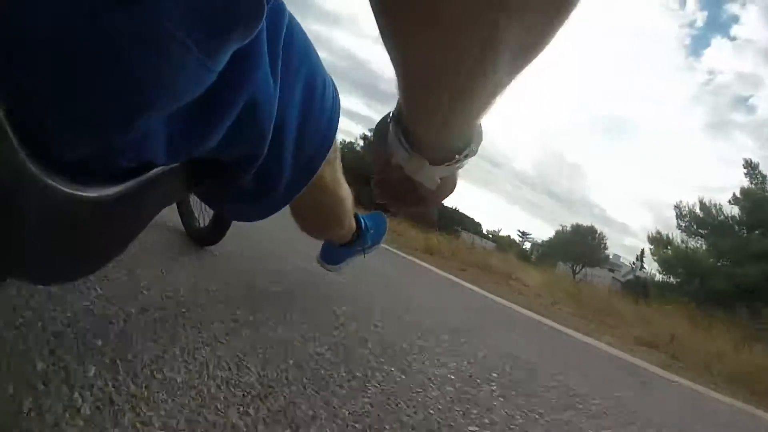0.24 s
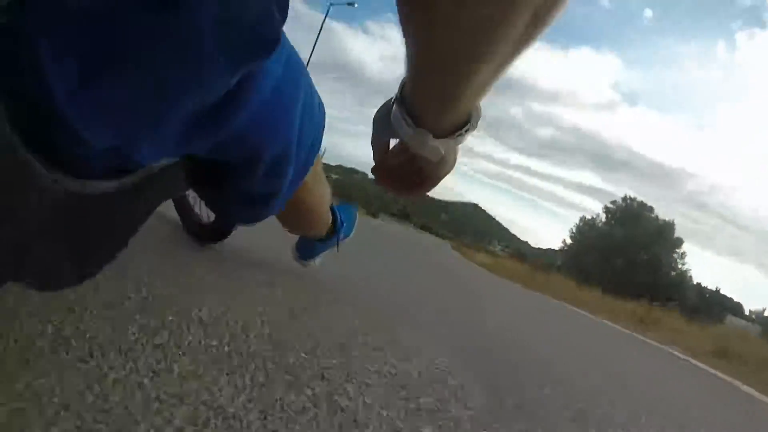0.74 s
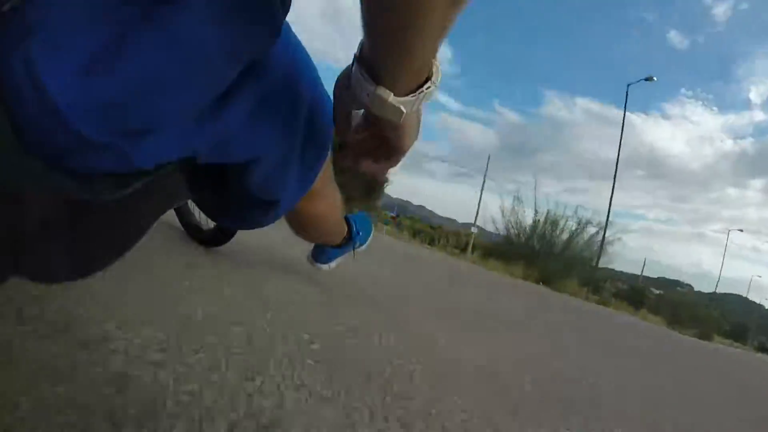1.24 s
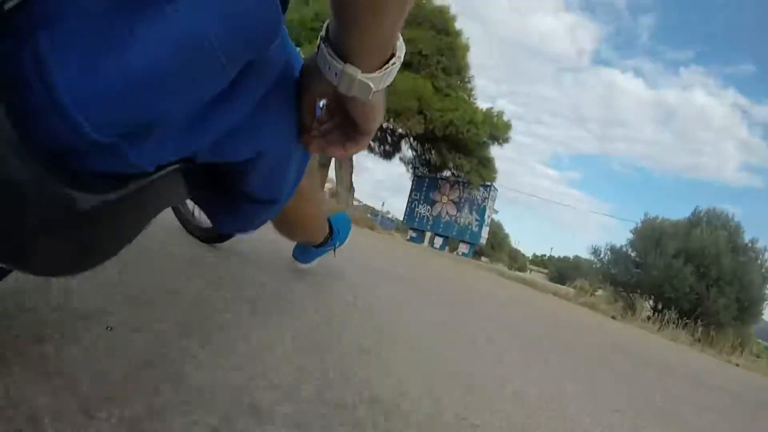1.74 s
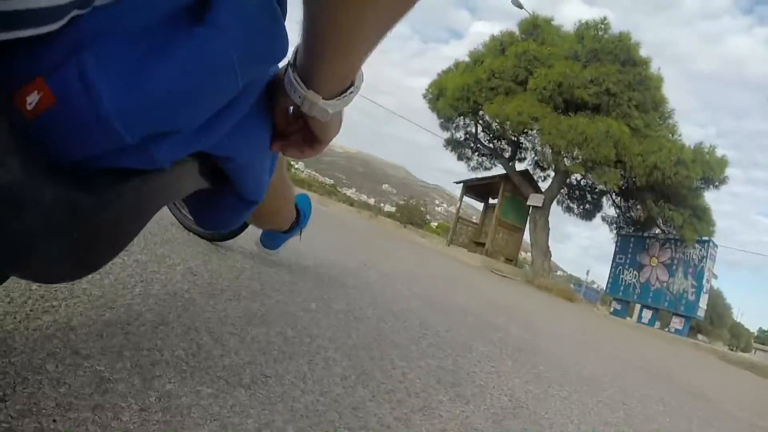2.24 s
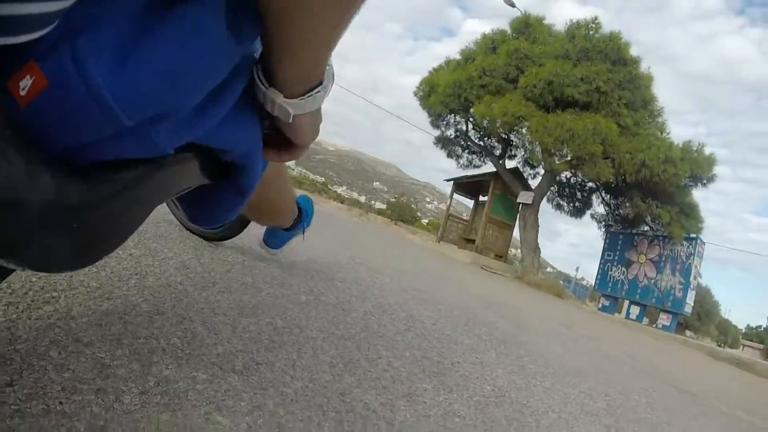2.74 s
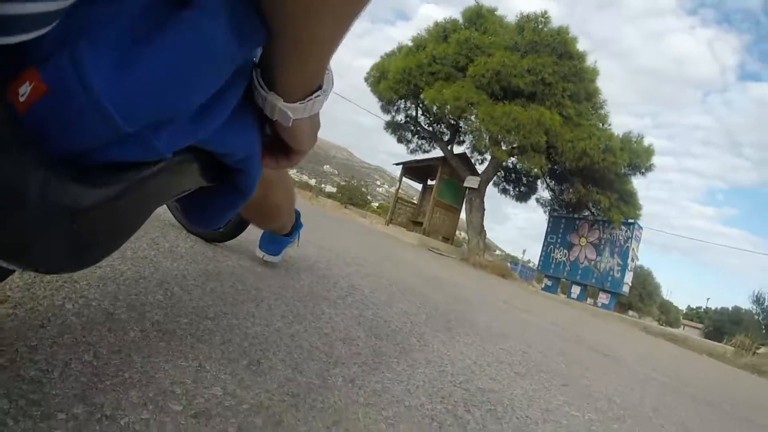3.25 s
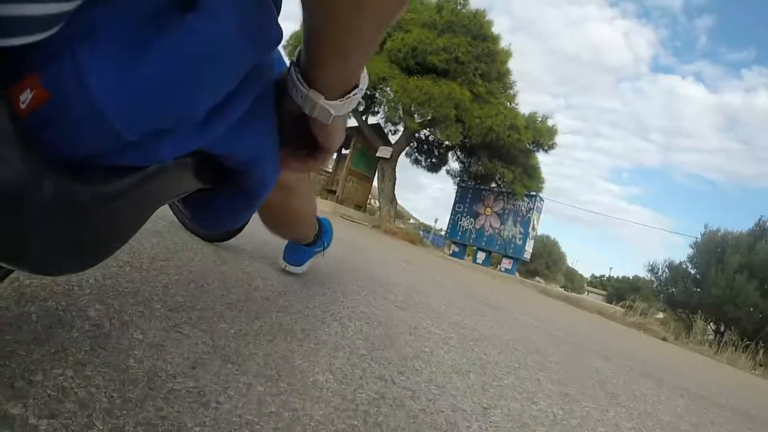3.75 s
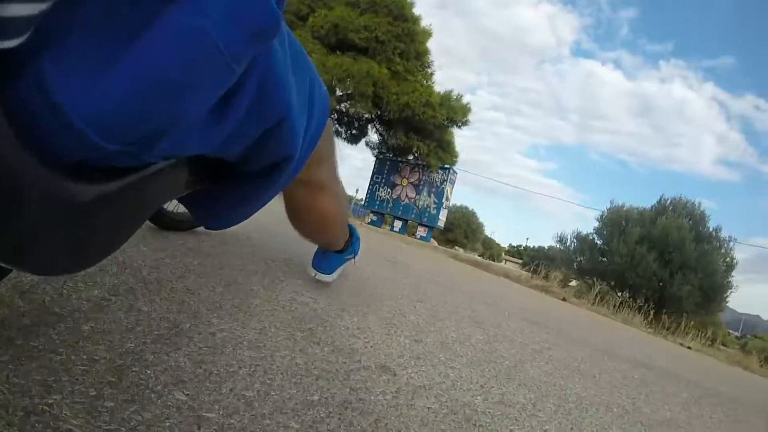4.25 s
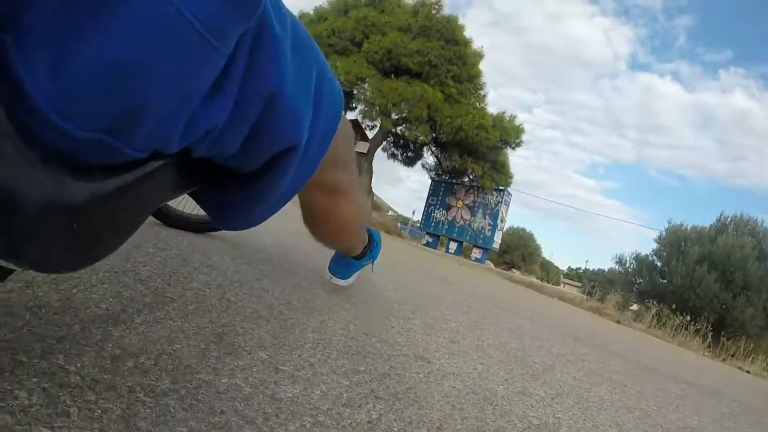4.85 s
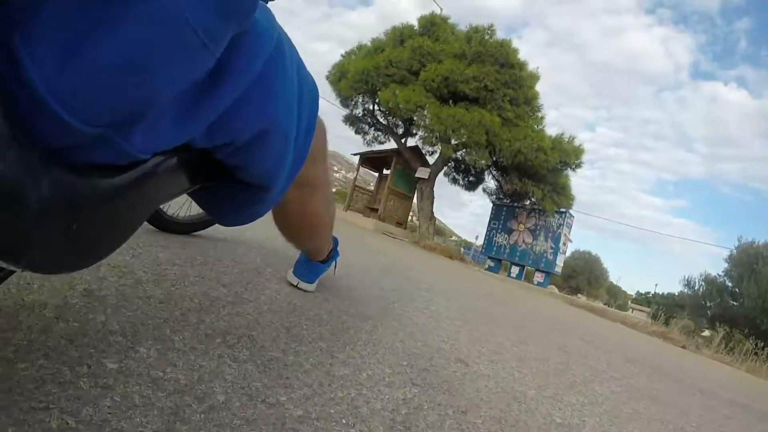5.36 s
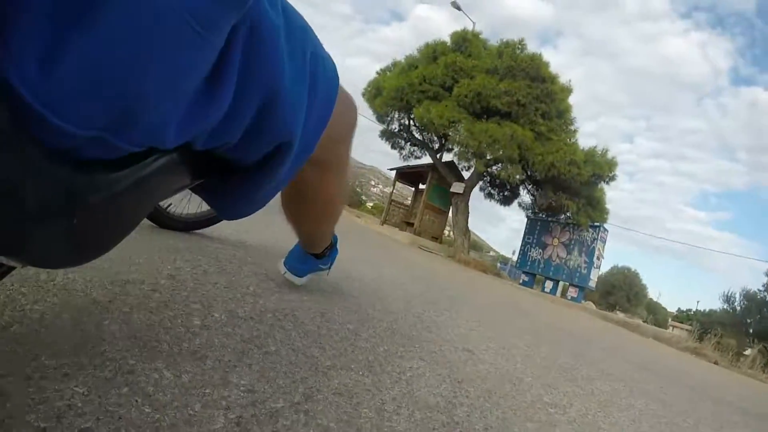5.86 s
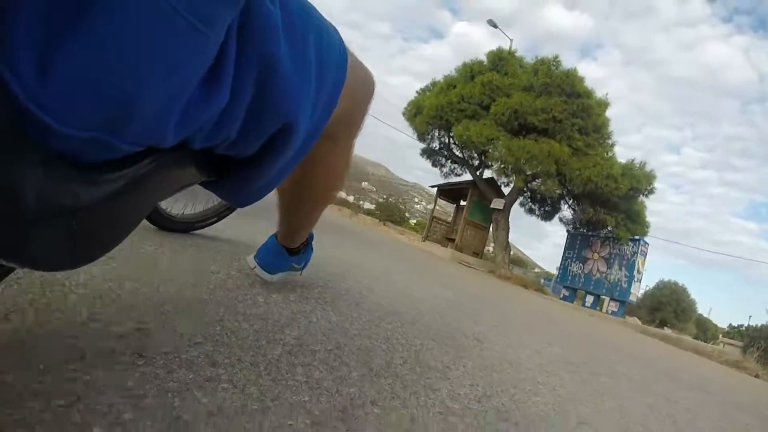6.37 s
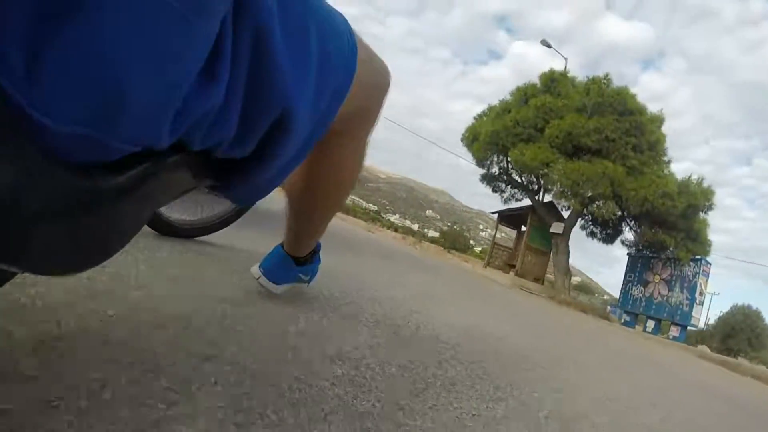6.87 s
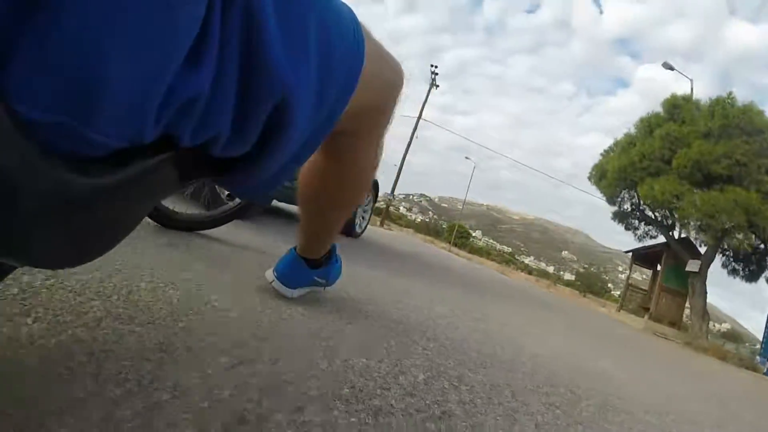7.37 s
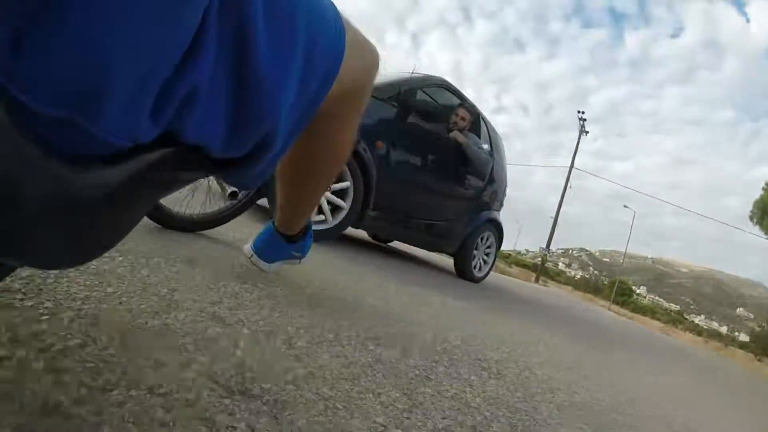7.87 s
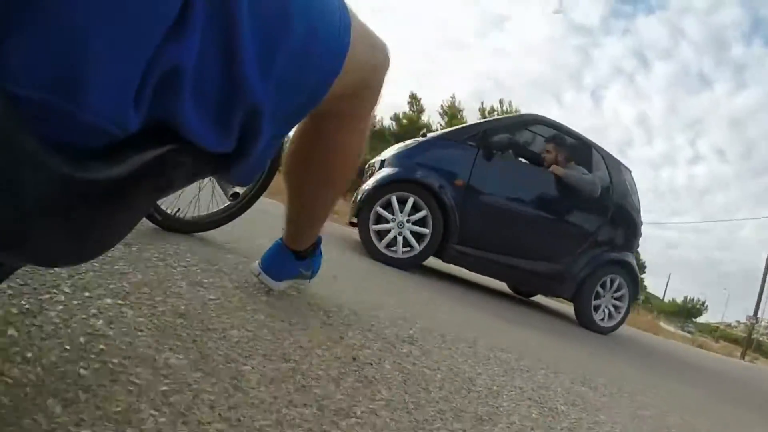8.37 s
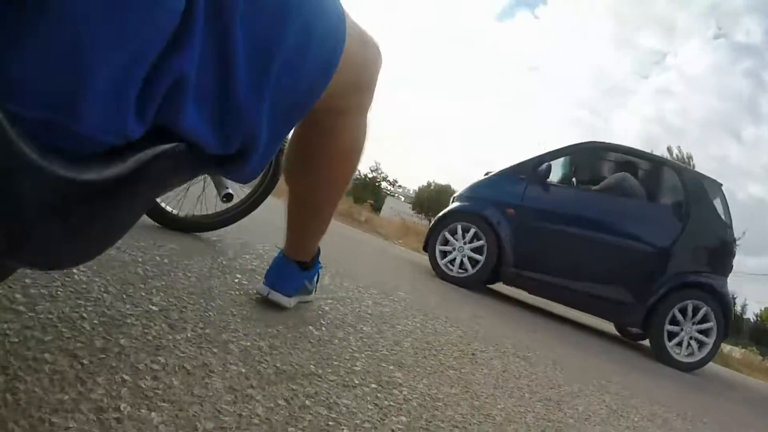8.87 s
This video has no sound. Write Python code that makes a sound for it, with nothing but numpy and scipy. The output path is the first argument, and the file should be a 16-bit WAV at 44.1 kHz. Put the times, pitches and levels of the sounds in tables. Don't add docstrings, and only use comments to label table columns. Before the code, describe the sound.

Everything is close and dry, carried through the frame of a small three-wheeler on an open asphalt road. From 0 to 2.2 s it is loud and rough: a low throbbing hum around 150 to 200 hertz, buried under dense gritty clatter, housing slaps and thin bright rattle in rapid irregular bursts, with a tiny squeak near 0.3. At 2.2 the wheels lift, touch briefly, then from about 2.4 to 2.8 the roar drops away to faint ringing spokes and a slow deep sway. Soft, dull bumps from 2.8 to 3.0 restore contact. Afterwards the ride is darker and smoother: a wavering low drone, weaker around 4.5, swelling on bumps near 3.7, 4.2 and 6.2, peppered with short metallic stone knocks, grit taps and small clicks. From 7.15 the mount ticks and snaps in brief crackles; around 8.25 a car's soft tyre roar swells and recedes. Rolling continues to 9.1.

```python
import sys
import numpy as np
from scipy import signal
from scipy.io import wavfile
from scipy.ndimage import uniform_filter1d

SR = 44100
rng = np.random.default_rng(int(sys.argv[2]) if len(sys.argv) > 2 else 0)


def ratio(d):
    e = np.asarray(d, float) / 20
    return 10 ** e


def to_wav(sig):
    pcm = np.clip(np.atleast_2d(sig), -1, 1) * 32767
    pcm = np.round(pcm).astype(np.int16)
    wavfile.write(sys.argv[1], SR, pcm.T)


N = 401751

# (time [s], first mode level [dB])
FRAME_LOAD = [(0.0, -21.5), (0.12, -16), (1.45, -15), (1.72, -20.5), (1.88, -15), (2.2, -15.5), (3.09, -20),
              (3.4, -12.5), (3.8, -17), (4.23, -18.5), (4.46, -27), (4.94, -18.5), (5.12, -14.5),
              (5.99, -17), (6.4, -16), (6.8, -16.5), (7.1, -12.5), (9.11, -13.5)]
# (frequency [Hz], width [Hz])
FRAME_MODES = [(146, 10), (218, 13)]
# (time [s], level [dB])
GRIP = [
    (2.2, 1),
    (2.23, -20),
    (2.28, -13),
    (2.32, -1.5),
    (2.37, -36.5),
    (2.79, -26),
    (2.84, -9.5),
    (2.92, -11.5),
    (2.99, 0.5),
]
# (time [s], level [dB], one-sidedness [0-1])
BUMPS = [(0.324, -15, 0.8), (1.518, 0, 0), (2.002, -1, 0.4), (3.072, 7.5, 0.4), (3.372, 6.5, 1),
         (3.568, -4.5, .05), (3.711, 14, 0.8), (3.98, -4.5, 0.89), (4.186, 13, 0.48), (4.39, 2.5, 0.06),
         (5.019, -9.5, .05), (5.399, 8.5, 0.81), (5.528, -5.5, 0.99), (5.559, 6.5, .05), (5.63, 8, 0.93),
         (5.678, -6, 0.5), (5.759, -8.5, 0.7), (5.828, 6.5, 1), (5.938, -4, 1), (6.011, 4, 1),
         (6.194, 19.5, 0.7), (6.42, -8, 0), (6.47, 8, 0.1), (6.92, 11, 0.6), (7.003, -17.5, 0.6),
         (7.258, 7, 1), (8.172, -1.5, 0.1), (8.249, 4, 0.2), (8.35, -7.5, 0), (8.571, 1, 0.8)]
# (time [s], unevenness [dB], grain [dB])
ROAD = [(0.0, -30, -28), (0.24, -24.5, -36.5), (0.92, -26.5, -26.5), (1.47, -25, -19.5), (2.03, -23.5, -29),
        (2.18, -39, -20), (2.23, -18.5, -27.5), (2.4, -29.5, -23.5), (2.93, -36, -52.5), (3.34, -26.5, -41),
        (3.87, -27.5, -47), (4.2, -32.5, -45), (4.75, -57, -49.5), (5.6, -45, -41), (6.1, -30, -45.5),
        (7.0, -37.5, -40), (8.6, -28, -39.5), (9.11, -45, -37.5)]
# (time [s], sway [dB], looseness [dB])
MOUNT = [(0.0, -57, -52), (1.02, -42, -45), (2.18, -58, -50), (2.3, -35, -52.5), (2.6, -31.5, -60),
         (2.92, -31, -73), (3.04, -22, -75), (3.21, -18, -57), (3.6, -21.5, -100), (3.85, -24, -74.5),
         (4.31, -22.5, -75), (4.74, -27.5, -81.5), (5.2, -25, -75), (5.7, -15, -75.5), (6.11, -25, -76.5),
         (6.9, -23.5, -64.5), (7.3, -34, -54), (9.11, -37.5, -56.5)]
# (frequency [Hz], width [Hz], level [dB])
BODY_RING = [(625, 74, 8.5), (450, 21, 1.5), (870, 39, -9), (1250, 200, -2), (1525, 180, 2),
             (1699, 71, 3.5), (2432, 200, -10.5), (2605, 290, -8.5), (3430, 180, -43), (3330, 110, -36)]
# (frequency [Hz], width [Hz], level [dB])
RUMBLE_RING = [(57, 25, -8.5), (101, 110, 7.5)]
# (time [s], peak level [dB], hold [s])
COARSE_PATCHES = [(0.05, -32.5, 0.01), (0.078, -17.5, 0.0058), (0.109, -14.5, 0.011), (0.14, -8, 0.019),
                  (0.165, -15, 0.0057), (0.209, -6.5, 0.016), (0.248, -5.5, 0.0077), (0.303, -11, 0.0085),
                  (0.361, -8.5, 0.0092), (0.393, -10.5, 0.015), (0.445, -8, 0.0058), (0.5, -4.5, 0.0026),
                  (0.537, -16, 0.018), (0.551, -13.5, 0.019), (0.588, -4.5, 0.0074), (0.608, -7, 0.0056),
                  (0.647, -10.5, 0.011), (0.671, -12, 0.0059), (0.712, -16.5, 0.015), (0.751, -6.5, 0.025),
                  (0.8, -7.5, 0.035), (0.864, -7.5, 0.051), (0.901, -5.5, 0.023), (0.93, -9, 0.015),
                  (0.995, -3.5, 0.043), (1.056, -10, 0.027), (1.099, -13.5, 0.012), (1.129, -11, 0.01),
                  (1.157, -6.5, 0.016), (1.211, -5.5, 0.032), (1.236, -6, 0.025), (1.29, -22, 0.014),
                  (1.312, -9, 0.0099), (1.341, -7.5, 0.0086), (1.358, -11.5, 0.004), (1.415, -6, 0.047),
                  (1.484, -4.5, 0.027), (1.508, -10, 0.0098), (1.546, -11.5, 0.0079), (1.578, -4.5, 0.0057),
                  (1.621, -10.5, 0.0085), (1.645, -15.5, 0.012), (1.687, -16.5, 0.013),
                  (1.703, -8.5, 0.023), (1.75, -11.5, 0.057), (1.793, -11.5, 0.0043), (1.868, -5, 0.0075),
                  (1.958, -15.5, 0.0098), (2.02, -39, 0.011), (2.039, -12, 0.0097), (2.087, -8, 0.0046),
                  (2.13, -8.5, 0.027), (2.184, -13, 0.015)]
# (frequency [Hz], width [Hz], level [dB])
HOUSING_RING = [(383, 220, 7), (1030, 322, 6), (1500, 334, 4), (2445, 495, 1.5), (3600, 2600, -40)]
# (frequency [Hz], width [Hz], level [dB])
HOUSING_TOP_RING = [(4400, 550, -31), (6440, 810, -29.5), (7000, 1100, -33), (9800, 1700, -31.5),
                    (10000, 1300, -41.5), (13500, 2400, -53)]
# (frequency [Hz], width [Hz], level [dB])
PUSH_RING = [(150, 64, -6.5), (250, 97, 2.5)]
# (frequency [Hz], width [Hz], level [dB])
TICK_RING = [(3640, 200, 0), (4990, 830, -4), (5680, 910, -4.5), (7350, 370, -8.5), (8030, 690, -16)]
# (start [s], length [s], level [dB])
RATTLE_RUNS = [(0.006, 0.04, -49), (0.098, 0.03, -46.5), (0.134, 0.074, -52), (0.198, 0.036, -56),
               (0.235, 0.038, -52), (0.285, 0.03, -52), (0.31, 0.034, -48.5), (0.355, 0.05, -53),
               (0.44, 0.03, -47), (0.479, 0.038, -53), (0.527, 0.048, -54), (0.58, 0.088, -47),
               (0.661, 0.044, -45.5), (0.699, 0.054, -46.5), (0.744, 0.094, -51), (0.846, 0.052, -50),
               (0.89, 0.086, -54.5), (0.994, 0.062, -40), (1.05, 0.092, -55), (1.13, 0.062, -48),
               (1.184, 0.106, -49), (1.293, 0.04, -51), (1.332, 0.05, -48), (1.392, 0.134, -51),
               (1.536, 0.058, -49), (1.612, 0.092, -52.5), (1.707, 0.1, -47), (1.828, 0.08, -47.5),
               (2.03, 0.03, -44), (2.08, 0.064, -51.5), (2.135, 0.076, -50)]
# (frequency [Hz], width [Hz], level [dB])
RATTLE_RING = [(9870, 2000, -1.5), (11400, 1800, -7)]
# (time [s], peak [dB], low ring [dB re peak], high ring [dB re peak])
WHEEL_KNOCKS = [(3.0824, -10.5, -10, -50), (3.2312, -24, -4.5, -46), (3.3735, -8.5, -10, -43),
                (3.411, -17.5, -10, -53.5), (3.772, -31.5, 3, -32), (4.208, -23.5, 0, -51),
                (4.6135, -22.5, -7, -46), (4.8949, -23, -2, -48), (4.985, -11.5, -18, -50),
                (5.07, -9, -12.5, -46), (5.2024, -4, -20, -40.5), (5.268, -17, -8, -44),
                (5.3229, -6, -8, -53.5), (5.5268, -12.5, -25.5, -51), (5.6929, -11.5, -4.5, -63),
                (5.7919, -16.5, -8, -62), (5.8522, -11, -12.5, -42), (6.161, -12, -14.5, -56),
                (6.2089, -14.5, -24, -46), (6.4654, -18.5, 1, -44), (6.6569, -17, -1.5, -46),
                (7.0879, -17.5, -6, -45), (7.3584, -9, -3.5, -62), (7.8009, -28, 3.5, -47),
                (7.9292, -13, -14, -47), (8.1253, -19.5, -6, -43), (8.3863, -39, 2, -42),
                (8.5216, -13.5, -2.5, -43), (8.5569, -15.5, -0.5, -46), (8.7026, -15.5, -4, -41)]
# (time [s], peak level [dB])
STONE_TAPS = [(3.322, -24), (3.3514, -18), (4.1152, -26), (4.1436, -19), (4.1686, -20), (4.2954, -25),
              (4.3454, -23.5), (4.4442, -22.5), (4.8181, -20.5), (5.962, -29), (5.4756, -23), (5.5998, -23),
              (5.6248, -19), (5.6632, -20), (5.743, -22.5), (5.8218, -21.5), (6.1366, -22.5),
              (6.3569, -19.5), (6.378, -22), (6.5342, -28), (6.712, -23.5), (6.7472, -22.5), (6.7907, -19),
              (6.8849, -21), (7.1406, -23.5), (7.5898, -20), (7.6322, -19.5), (7.908, -17), (8.0426, -19.5),
              (8.9327, -34)]
# (time [s], peak level [dB])
WHEEL_GRIT = [(3.014, -33), (3.13, -26), (3.198, -24.5), (3.446, -19.5), (3.564, -27), (3.598, -21),
              (3.727, -23.5), (4.316, -29), (4.478, -30), (4.531, -28), (4.56, -26.5), (4.721, -30),
              (4.754, -24.5), (4.858, -32), (4.513, -38), (5.15, -24), (5.364, -24.5), (5.513, -29.5),
              (5.983, -24.5), (6.266, -22), (6.324, -25), (6.414, -22), (6.506, -26.5), (6.926, -20.5),
              (7.065, -28), (7.159, -18), (7.208, -22), (7.242, -24), (7.47, -15), (7.518, -33),
              (7.826, -19.5), (8.319, -19), (8.4, -19), (8.457, -30), (8.591, -18), (8.607, -22),
              (8.855, -25), (8.891, -27), (9.08, -24)]
# (frequency [Hz], level [dB], decay by 60 dB [s])
WHEEL_MODES = [(622.6, -16, 0.074), (1137, -12, 0.019), (1640, -5.5, 0.03), (2210, -13, 0.011),
               (2600, -14.5, 0.021), (2668, -26, 0.027), (3580, -15, 0.043), (4170, -20, 0.023),
               (4550, 0.5, 0.096), (6200, -35, 0.063), (6740, -17, 0.036), (7500, -36, 0.044)]
# (time [s], peak level [dB])
LANDING_BUMPS = [
    (2.833, -23.5),
    (2.897, -14),
    (2.955, -7.5),
    (3.036, -5),
]
# (start [s], length [s], peak level [dB])
SNAP_BOUTS = [(7.149, 0.03, -47), (7.218, 0.051, -36.5), (7.374, 0.003, -54), (7.455, 0.013, -35),
              (7.772, 0.02, -38), (7.861, 0.0034, -33), (7.964, .007, -39.5), (8.041, 0.027, -34),
              (8.139, .007, -35.5), (8.1745, 0.033, -31.5), (8.231, .03, -38.5), (8.2904, 0.038, -39.5),
              (8.39, 0.023, -35.5), (8.448, 0.037, -43), (8.5212, 0.091, -33), (8.698, .017, -31.5),
              (8.935, 0.011, -37)]
# (frequency [Hz], width [Hz], level [dB])
SNAP_RING = [(674, 270, 23), (1510, 1600, 10.5), (3220, 1900, -10), (5380, 640, 7), (6960, 250, -7),
             (10170, 1000, -5), (10900, 2200, 0.5)]
# (time [s], peak level [dB])
LONE_CLICKS = [(3.0798, -51), (3.1436, -57.5), (3.202, -61), (3.2354, -35.5), (3.2968, -46), (3.3756, -54),
               (3.4474, -38), (3.4878, -39.5), (3.5966, -49), (3.637, -40), (3.7328, -43.5), (3.7722, -37),
               (3.8979, -47.5), (3.9278, -48.5), (3.9593, -45), (4.0351, -49), (4.1448, -44.5),
               (4.1872, -38.5), (4.2127, -48), (4.2321, -43.5), (4.3564, -62), (4.3908, -63), (4.6153, -64),
               (4.7215, -56), (4.9864, -52), (5.0732, -51.5), (5.2044, -37), (5.2658, -47.5), (5.3227, -48),
               (5.3576, -41), (5.4105, -49), (5.5267, -56), (5.5696, -46.5), (5.618, -50), (5.8515, -51),
               (6.1902, -45.5), (6.2655, -39), (6.287, -49), (6.3189, -56), (6.3493, -57.5), (6.4526, -53),
               (6.4696, -50.5), (6.484, -42.5), (6.5115, -49.5), (6.5254, -40.5), (6.5848, -60.5),
               (6.5988, -46), (6.6242, -64), (6.6417, -44.5), (6.6671, -44), (6.695, -60), (6.7409, -47),
               (6.7459, -46), (6.8058, -49.5), (6.8682, -49), (6.928, -33), (6.9769, -41.5),
               (7.0383, -46.5), (7.0672, -39)]
# (frequency [Hz], width [Hz], level [dB])
CLICK_RING = [(3200, 1600, 6), (5840, 730, 5.5)]
# (time [s], peak level [dB])
START_CLICK = [
    (0.0015, -25),
]
# (frequency [Hz], width [Hz], level [dB])
START_RING = [(6000, 7500, 4.5), (14000, 6800, 3)]
# (time [s], first [dB], second [dB], third [dB])
SPOKE_LEVELS = [
    (2.19, -100, -100, -100),
    (2.21, -39.5, -87, -71),
    (2.34, -52, -81, -74),
    (2.39, -58, -62, -71),
    (2.53, -55, -56, -62),
    (2.618, -70, -62, -64),
    (2.8, -77, -64, -64),
    (3.0, -61, -66, -64),
]
# (strongest [Hz], weaker [Hz], weakest [Hz])
SPOKE_LINES = [
    [1766, 1561, 1631],
    [2724, 2789, 2765],
    [1066, 1130, 904],
]
# (time [s], frequency [Hz], level [dB])
SPOKE_WHIRR = [
    (2.36, 1130, -86),
    (2.5, 1076, -59),
    (2.75, 1090, -73),
    (2.9, 1030, -67),
    (3.05, 953, -67),
]
# (time [s], frequency [Hz], level [dB])
ROAD_WHINE = [
    (2.85, 3200, -97),
    (2.91, 3250, -67),
    (2.97, 3330, -70),
    (3.05, 3400, -85),
]
# (time [s], peak level [dB])
LOW_PINGS = [(4.5337, -62), (4.7238, -60), (4.818, -65), (4.9857, -49), (5.075, -61), (5.2057, -55),
             (5.2695, -65), (5.3214, -62), (5.5279, -64), (5.5693, -63.5), (5.6182, -55.5), (5.6911, -61),
             (5.8158, -61), (5.8547, -56)]
# (time [s], peak level [dB])
HIGH_PINGS = [(4.3905, -61), (4.5347, -61), (4.615, -64), (4.7253, -69), (4.8185, -65), (4.9896, -60),
              (5.073, -54), (5.205, -53), (5.27, -66), (5.3239, -54), (5.3583, -60), (5.5269, -65),
              (5.6177, -63), (5.8505, -65)]
# (time [s], level [dB])
CAR_LEVEL = [
    (7.2, -60.5),
    (7.9, -51.5),
    (8.25, -38),
    (8.65, -54),
    (9.11, -53),
]
# (frequency [Hz], width [Hz], level [dB])
CAR_RING = [(523, 440, 4), (890, 160, -5.5)]

COARSE_END_S = 2.198
AIRBORNE_FROM_S, AIRBORNE_TO_S = 2.3, 2.8
BODY_TOP_HZ = 3150
PATCH_DB = -13


def rms_one(x):
    return x / np.sqrt(np.mean(x ** 2) + 1e-20)


def in_time(rows):
    s, *columns = np.transpose(rows)
    after = -120 if s[-1] < 9 else None
    return [np.interp(np.arange(N) / SR, s, column, right=after) for column in columns]


def peak(x, hz, width):
    r = np.exp(-np.pi * max(width, 1) / SR)
    poles = [1, -2 * r * np.cos(2 * np.pi * hz / SR), r * r]
    return signal.lfilter([(1 - r * r) / 2, 0, (r * r - 1) / 2], poles, x + 1e-18)


def dying_line(strikes, hz, t60):
    r, w = ratio(-60 / (t60 * SR)), 2 * np.pi * hz / SR
    return signal.lfilter([0, np.sin(w)], [1, -2 * r * np.cos(w), r * r], strikes + 1e-18)


def fading(x, fade_s):
    return signal.lfilter([1], [1, -np.exp(-1 / (fade_s * SR))], x)


def resonate(x, modes, steep=False):
    if steep:
        return sum(ratio(db) * peak(peak(x, hz, 1.5 * width), hz, 1.5 * width) for hz, width, db in modes)
    return sum((-1) ** k * ratio(db) * peak(x, hz, width) for k, (hz, width, db) in enumerate(modes))


def drift(rate_hz):
    r = np.exp(-2 * np.pi * rate_hz / SR)
    return rms_one(signal.lfilter([1], [1, -2 * r, r * r], rng.standard_normal(N + SR))[SR:])


def evened(x, span_s, share):
    level = np.sqrt(uniform_filter1d(x * x, int(span_s * SR)) + 1e-9)
    return rms_one(x / level ** np.clip(share, 0, 1))


def band(low_hz, high_hz):
    sos = signal.butter(3, [low_hz, high_hz], "band", fs=SR, output="sos")
    return signal.sosfilt(sos, rng.standard_normal(N + SR))[SR:]


def below(x, hz):
    return signal.sosfilt(signal.butter(4, hz, "low", fs=SR, output="sos"), x)


def frame(first_db, second_db):
    low_hz, low_width_hz, coarse_twist_db = 137, 18, -4.5
    lean_s = .0018
    n, out = np.arange(N), 0
    coarse = uniform_filter1d((n < COARSE_END_S * SR) * 1., size=900)
    for k, ((hz, width), db) in enumerate(zip(FRAME_MODES, (first_db, second_db))):
        road = rng.standard_normal(N) * ratio(3.0 * drift(25))
        mode = peak(peak(road, hz, width), hz, 4.3 * width)
        if k == 0:
            laden = rms_one(peak(peak(road, low_hz, low_width_hz), low_hz, 3.5 * low_width_hz))
            mode += coarse * (laden * np.std(mode) - mode)
        else:
            db = db + coarse_twist_db * coarse
        out = out + ratio(db) * evened(mode, span_s=.07, share=.8)
    return np.interp(n - lean_s * SR * coarse * out, n, out)


def bumps():
    rise_s, fall_s = 0.087, 0.1
    t = np.arange(0, N, 64) / SR
    out = np.zeros((3, len(t)))
    for s, db, side in BUMPS:
        slope = np.interp(t, [s - rise_s, s, s + fall_s], [0, 1, 0])
        out += np.outer([1 - side, side, 1], db * slope)
    return [np.interp(np.arange(N) / SR, t, row) for row in out]


def swell():
    kicks, end = np.zeros(N), int(COARSE_END_S * SR)
    for s, db, _ in COARSE_PATCHES:
        kicks[int(s * SR)] = ratio(db)
    kicks[0] = ratio(-10.0)
    level = fading(kicks, .025)[:end] + ratio(-21.0)
    db = uniform_filter1d(20 * np.log10(level), size=260)
    return np.pad(db - uniform_filter1d(db, size=13000), (0, N - end))


def contacts(shaking, reach, gust_db, spread_db, chatter_s, chatter):
    speed = np.abs(np.gradient(evened(shaking, span_s=0.048, share=0.89)))
    turn = np.diff(np.sign(shaking), prepend=0)
    crossing = (turn < 0) + 0.25 * (turn > 0)
    force = np.maximum(rms_one(speed) * ratio(gust_db * drift(32)) - reach, 0)
    force = force * ratio(spread_db * np.minimum(rng.standard_normal(N), 1.5))
    slap = crossing * force
    tail = fading(slap, chatter_s) * rng.standard_normal(N)
    return slap * rng.choice([-1, 1], N) + chatter * tail


def clatter(shaking):
    t = np.arange(N) / SR
    small = rng.random(N) < 8 / SR
    patches = small * ratio(-32 + 3.6 * rng.standard_normal(N))
    patches *= ratio(np.interp(t, [0, .8], [-8, 0]))
    patches[0] = ratio(-14.0)
    held = patches.copy()
    for s, db, hold_s in COARSE_PATCHES:
        patches[int(s * SR)] = ratio(db + PATCH_DB)
        held[int((s + hold_s) * SR)] = ratio(db + PATCH_DB)
    strength = fading(held, 0.011) + ratio(-88.0)
    for s, db, hold_s in COARSE_PATCHES:
        strength[int(s * SR):int((s + hold_s) * SR)] = ratio(db + PATCH_DB)
    strength = uniform_filter1d(strength * (t < COARSE_END_S), size=130)
    slaps = contacts(shaking, 0.014, 2.0, 2.0, chatter_s=0.0011, chatter=1.0)
    opening = np.minimum(patches * ratio(29.0), 1) ** 2
    slaps = rms_one(slaps) + ratio(17.0) * opening
    housing = below(resonate(slaps, HOUSING_RING), 6000) + resonate(slaps, HOUSING_TOP_RING, steep=True)
    push = ratio(26.5) * resonate(below(patches, 480), PUSH_RING)
    return strength * evened(housing, span_s=0.035, share=.9) + push


def roll(roll_db, shaking):
    stone_hits = (rng.random(N) < 30 / SR) * ratio(3.0 * rng.standard_normal(N))
    bursts = np.minimum(fading(stone_hits, 0.02), 1.3)
    grain = rng.standard_normal(N) * (0.6 + bursts) * ratio(3.0 * drift(110))
    body = below(resonate(grain, BODY_RING, steep=True), BODY_TOP_HZ)
    end = int(COARSE_END_S * SR)
    slope = np.gradient(shaking[:end])
    fall = np.clip(-slope / np.std(slope), -1, 2)
    buzz = below(resonate(grain[:end] * ratio(6.0 * fall), HOUSING_RING), 3500)
    wide = rms_one(buzz) * np.std(body[:end])
    body[:end] += .9 * (wide - body[:end])
    return ratio(roll_db - 1) * evened(body, span_s=1.0, share=0.15)


def rumble_and_thud(rumble_db, thud_db):
    jolts = ratio(5.2 * drift(20))
    thud = evened(below(band(219.0, 325.0), 350) * jolts, span_s=0.037, share=.35)
    rumble = evened(resonate(rng.standard_normal(N) * jolts, RUMBLE_RING), span_s=0.48, share=1.0)
    return ratio(thud_db) * thud + below(ratio(rumble_db) * rumble, 220)


def stones():
    gravel_per_s, gravel_from_s = 4, 3.1
    span = N / SR - gravel_from_s - .05
    luck = rng.random((int(gravel_per_s * span), 2))
    gravel = [(gravel_from_s + span * a, -38 - 2.5 * np.log(b)) for a, b in luck]
    grit = [(s, db - 2, -4.5, -45) for s, db in WHEEL_GRIT]
    taps = [(s, db, -4, -50.5) for s, db in list(STONE_TAPS) + gravel]
    return list(WHEEL_KNOCKS) + grit + taps


def knocks():
    s, peak_db, low_db, high_db = np.transpose(stones())
    at, out = (s * SR).astype(int), np.zeros(N)
    luck = rng.standard_normal((len(at), len(WHEEL_MODES)))
    for k, (hz, db, t60) in enumerate(WHEEL_MODES):
        colour_db = 0 * s
        if hz < 1400:
            colour_db = low_db + 10.5
        elif hz > 3200:
            colour_db = np.minimum(high_db, -31) + 9.5
        strikes = np.zeros(N)
        strikes[at] = ratio(peak_db + colour_db + .5 * db - 27.0 + 2.5 * luck[:, k])
        scuff = fading(strikes, 0.0086) * rng.standard_normal(N)
        ring = dying_line(5.0 * strikes + scuff, hz, 0.59 * t60)
        if hz <= 3200:
            ring = below(ring, BODY_TOP_HZ)
        out += peak(ring, hz, 1100)
    return out


def sway(sway_db, aloft):
    driven = evened(below(band(16, 36), 86), span_s=0.15, share=0.42)
    free = np.sqrt(2) * np.sin(2 * np.pi * 21.5 * np.arange(N) / SR)
    return ratio(sway_db) * (driven * (1 - aloft) + free * aloft)


def landing():
    pushes, brush = np.zeros(N), np.zeros(N)
    for s, db in LANDING_BUMPS:
        pushes[int(s * SR)] = ratio(db + 33.0)
    brush[int(2.29 * SR)] = ratio(-9 + 68.0)
    ringing = peak(peak(brush, 146, 5.0), 160, 27.0)
    return ringing + resonate(below(pushes, 560), [(154, 48, -22), (246, 84, 3.0), (317, 83, -1.0)])


def ticks(shaking, tick_db):
    slaps = contacts(shaking, 0.06, 1.5, 4.5, chatter_s=0.0021, chatter=0.73)
    return ratio(tick_db) * evened(resonate(slaps, TICK_RING, steep=True), span_s=0.1, share=0.5)


def bout_lift():
    t, lift = np.arange(0, N, 64) / SR, 0
    for s, length, _ in SNAP_BOUTS:
        end = s + length
        lift = lift + np.interp(t, [s - .005, s, end, end + 0.011], [0, 1, 1, 0])
    return 6.5 * np.interp(np.arange(N) / SR, t, np.minimum(lift, 1))


def snap_times():
    period_s, offbeat_db, spread_db = .00472, -3.5, 2.5
    luck = rng.standard_normal((len(SNAP_BOUTS), 30))
    events = []
    for i, (s, length, db) in enumerate(SNAP_BOUTS):
        for k in range(int(length / period_s) + 1):
            events.append((s + k * period_s, db + offbeat_db * (k % 3) ** 2 + spread_db * luck[i, k]))
    return events


def snaps(events, modes, burst_s):
    hits = np.zeros(N)
    for s, db in events:
        hits[int(s * SR)] = ratio(db + 9.0)
    burst = fading(hits, burst_s) * rng.choice([-1, 1], N)
    return resonate(burst, modes, steep=True)


def rattle(shaking):
    upward = np.diff(np.sign(shaking), prepend=0) > 0
    runs = np.full(N, ratio(-14))
    for s, length, db in RATTLE_RUNS:
        runs[int((s + .003) * SR):int((s + length - .006) * SR)] = ratio(db + 65.0)
    force = runs * ratio(2.2 * drift(34) + 4.0 * rng.standard_normal(N))
    clicks = upward * force * (np.arange(N) / SR < COARSE_END_S)
    ring = rms_one(below(resonate(clicks, RATTLE_RING, steep=True), 12500))
    return ratio(-54.5) * ring * np.sqrt(COARSE_END_S * SR / N)


def spokes():
    t, out = np.arange(N) / SR, 0
    for db, group, waver_db in zip(in_time(SPOKE_LEVELS), SPOKE_LINES, (1.5, 3, 4)):
        for hz, line_db in zip(group, (2.5, -9, -12)):
            out = out + ratio(db + line_db + waver_db * drift(21)) * np.sin(2 * np.pi * hz * t)
    return out


def whirr(rows, width_hz):
    hz, db = in_time(rows)
    phase = 2 * np.pi * np.cumsum(np.maximum(hz, 0)) / SR
    return ratio(db) * (drift(width_hz) * np.sin(phase) + drift(width_hz) * np.cos(phase))


def squeak():
    start_s, end_s, hz, db = .268, .302, 1950, -35
    t = np.arange(N) / SR
    envelope = np.interp(t, [start_s - .004, start_s, end_s, end_s + 0.0034], [0, 1, 1, 0])
    return ratio(db) * envelope * np.sin(2 * np.pi * hz * t)


def pings():
    out = 0
    for rows, hz in ((LOW_PINGS, 3500), (HIGH_PINGS, 4600)):
        strikes = np.zeros(N)
        for s, db in rows:
            strikes[int(s * SR)] = ratio(db)
        out = out + peak(dying_line(strikes, hz, .07), hz, 400)
    return out


def car():
    level_db = np.interp(np.arange(N) / SR, *np.transpose(CAR_LEVEL), left=-120)
    return ratio(level_db) * rms_one(resonate(rng.standard_normal(N), CAR_RING, steep=True))


def scene():
    t = np.arange(N) / SR
    (load_db,), (uneven_db, grain_db), (sway_db, loose_db) = in_time(FRAME_LOAD), in_time(ROAD), in_time(MOUNT)
    grip_db = np.interp(t, *np.transpose(GRIP))
    bend_db, twist_db, jolt_db = bumps()
    patch_db = swell()
    aloft = uniform_filter1d(((t > AIRBORNE_FROM_S) & (t < AIRBORNE_TO_S)) * 1., size=900)

    first_db = load_db + bend_db + grip_db + .3 * patch_db
    second_db = -24.5 + .3 * (load_db - load_db.mean()) + grip_db + twist_db + .3 * patch_db
    rumble_db = -26 + 0.17 * (uneven_db - uneven_db.mean()) + 0.52 * jolt_db + grip_db
    thud_db = uneven_db + 0.57 * jolt_db + grip_db + .6 * patch_db
    roll_db = grain_db + .12 * jolt_db + 0.94 * grip_db + .6 * patch_db
    tick_db = loose_db + .4 * jolt_db + 0.67 * grip_db + bout_lift()

    shaking = frame(first_db, second_db) * (1 - 0.16 * aloft)
    through = shaking + roll(roll_db, shaking) + rumble_and_thud(rumble_db, thud_db)
    through += knocks() + sway(sway_db, aloft) + landing()
    through += spokes() + whirr(SPOKE_WHIRR, width_hz=70) + whirr(ROAD_WHINE, width_hz=110)
    through += squeak() + pings() + car()
    through -= 1.4 * peak(through, 404, 140)

    loose = clatter(shaking) + ticks(shaking, tick_db) + rattle(shaking)
    loose += below(snaps(snap_times(), SNAP_RING, burst_s=0.00047), 11300)
    loose += snaps(LONE_CLICKS, CLICK_RING, burst_s=0.00032)
    loose += snaps(START_CLICK, START_RING, burst_s=0.00051)
    return (through + loose)[None]


def low_pass(x):
    return signal.sosfilt(signal.butter(12, 15800, fs=SR, output="sos"), x)


def record(dry):
    top = .9
    hiss = ratio(-79.5) * below(rng.standard_normal(N), 10500)
    fade = np.minimum((N - np.arange(N)) / (.004 * SR), 1)
    return low_pass(fade * top * np.tanh(1.062 * (dry + hiss) / top))


dry = scene()
out = record(dry)
to_wav(out)
```